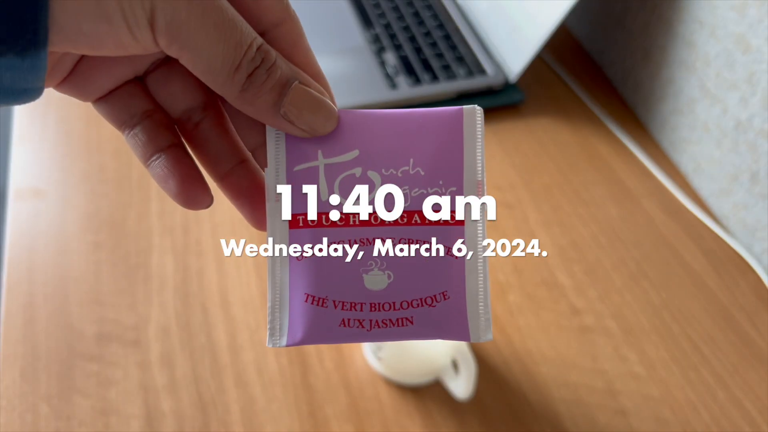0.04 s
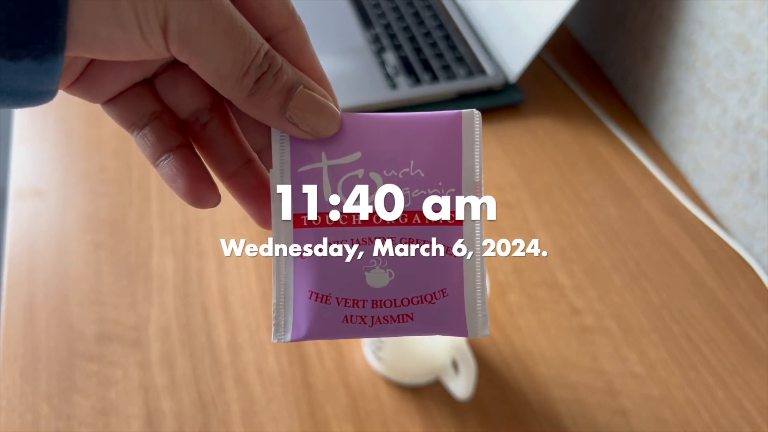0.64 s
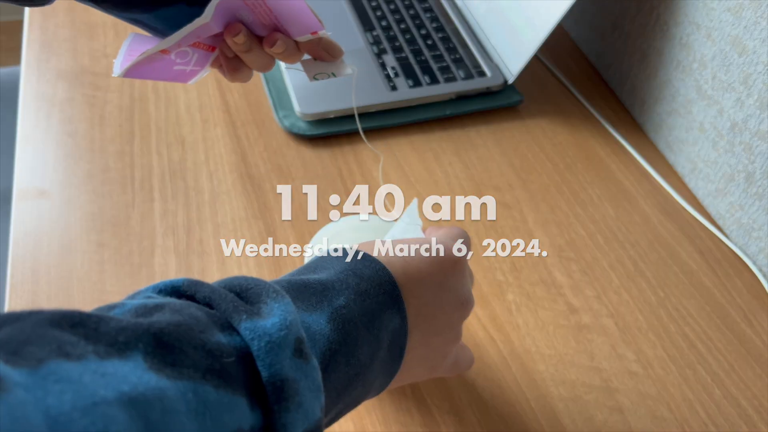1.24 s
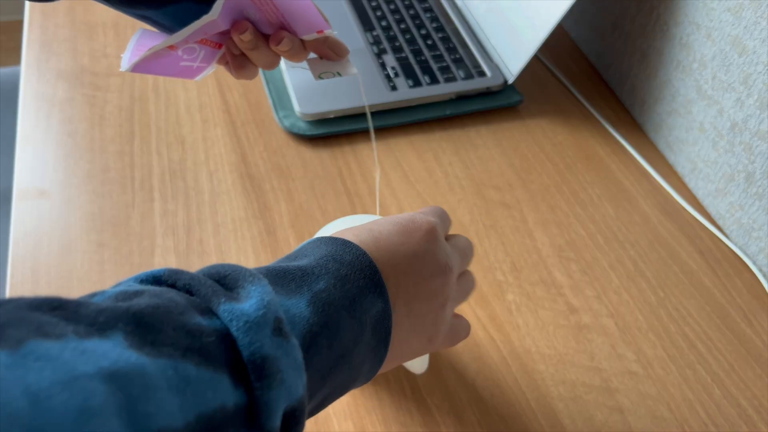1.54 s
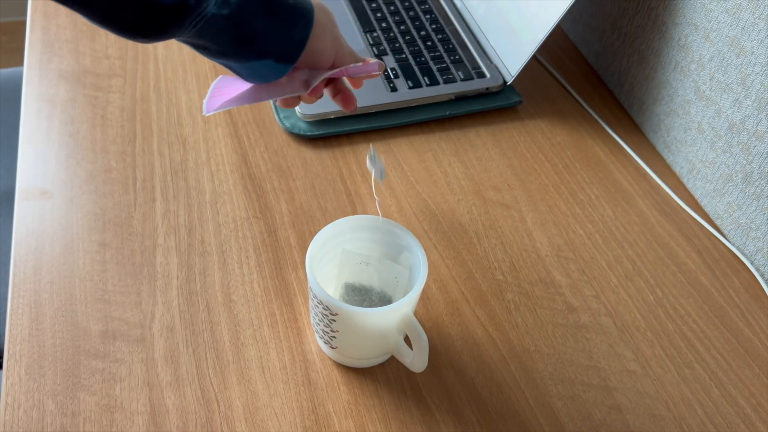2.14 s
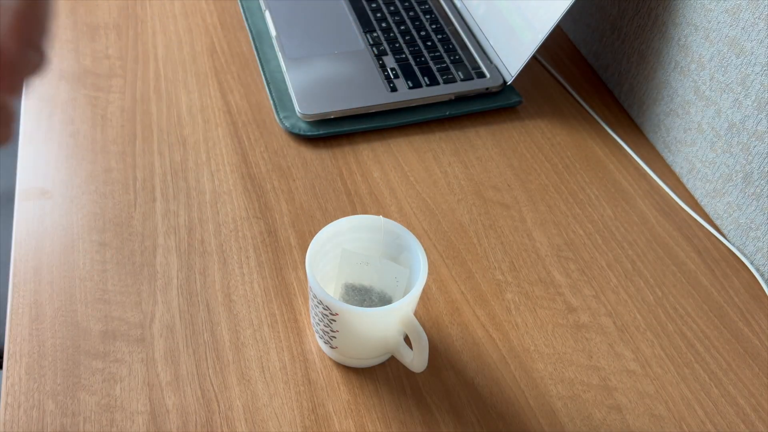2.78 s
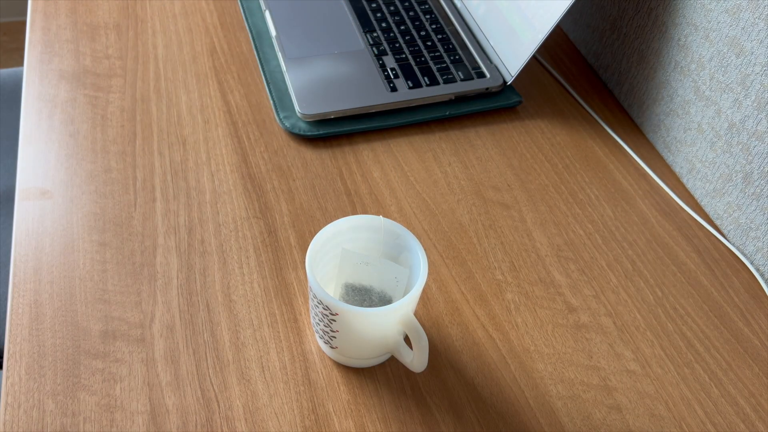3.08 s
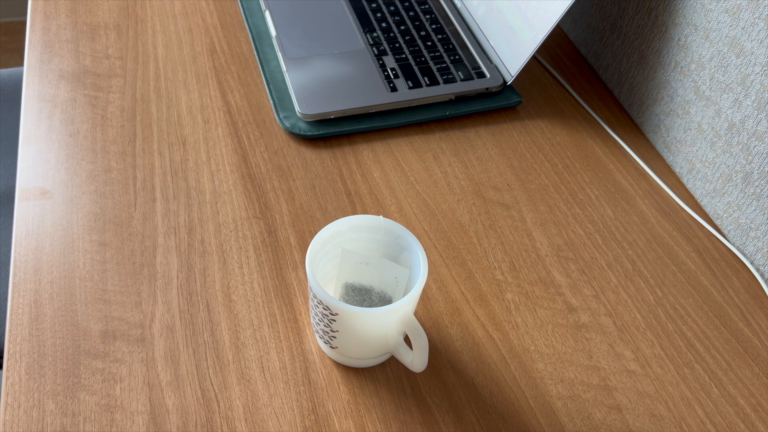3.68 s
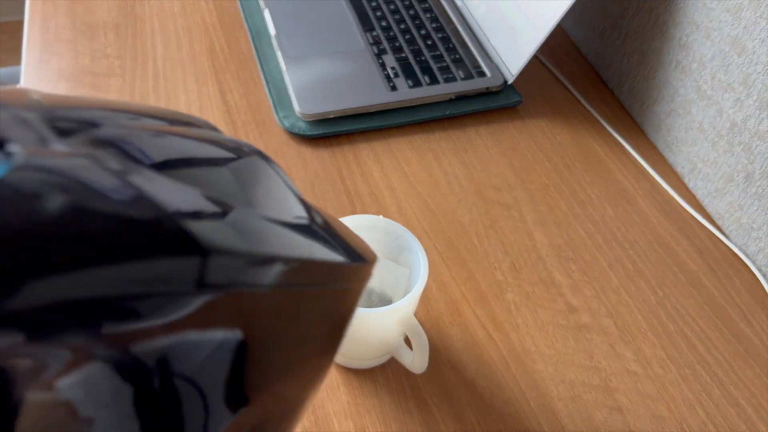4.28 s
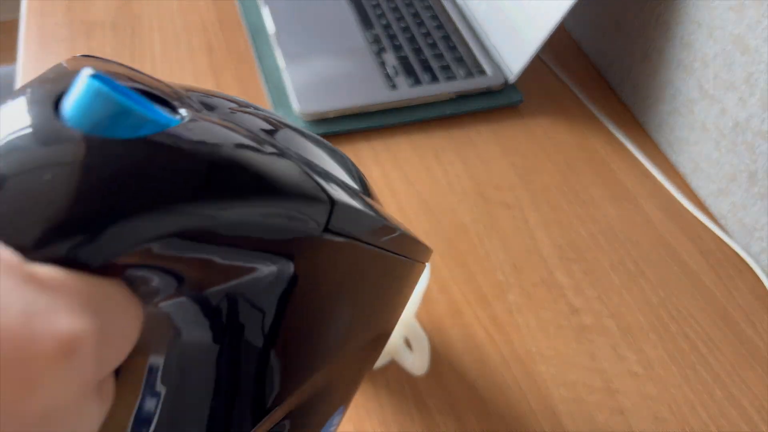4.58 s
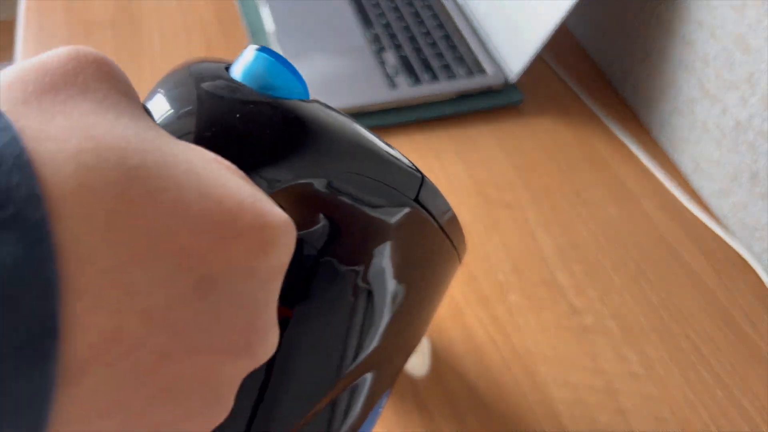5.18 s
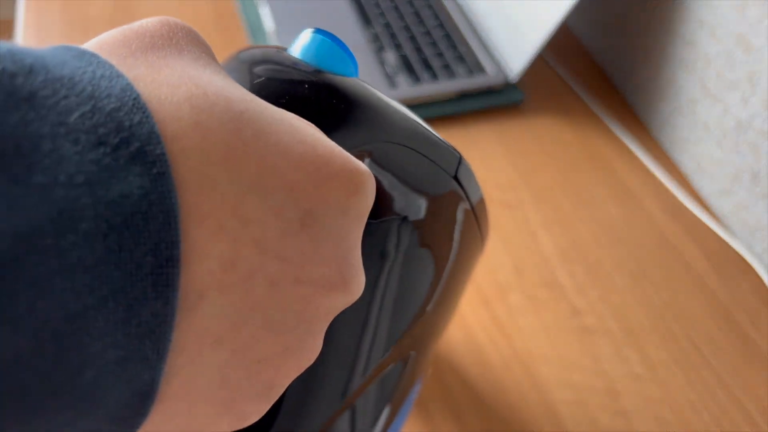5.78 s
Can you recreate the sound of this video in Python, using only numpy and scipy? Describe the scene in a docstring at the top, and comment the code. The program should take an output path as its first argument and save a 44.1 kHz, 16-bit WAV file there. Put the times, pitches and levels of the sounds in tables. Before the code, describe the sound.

A paper tea-bag wrapper rustles and tears open, with light knocks and clinks, then water starts trickling into a mug over a low hum.

```python
"""A low appliance hum, room rumble and a thin, narrow hiss lie under a desk, heard from close up.
From 1.2 s come light knocks and soft sliding strokes, and a paper tea-bag wrapper is handled: it rustles
as fibres catch and let go, its creases snap and it tears open. Two small clinks ring near 3.4 s.
Around 4 s something judders as a kettle comes near, and more strokes and knocks follow.
At 5.5 s water starts to trickle into a mug, a crowd of tiny ringing bubbles."""
import sys
import numpy as np
from scipy import signal
from scipy.fft import rfft, irfft, next_fast_len
from scipy.io import wavfile
from scipy.ndimage import map_coordinates

SR = 44100
rng = np.random.default_rng(int(sys.argv[2]) if len(sys.argv) > 2 else 0)


def write(x):
    x = np.atleast_2d(x).T
    wavfile.write(sys.argv[1], SR, np.round(np.clip(x, -1, 1) * 32767).astype(np.int16))


N = 256662

# the hum's envelope: (time [s], relative level [dB])
HUM_ENVELOPE = [(0.05, -45.5), (0.99, -44), (1.23, -49), (1.33, -44), (1.41, -46), (2.8, -44), (3.24, -45),
                (4.39, -44), (5.05, -48), (5.41, -44.5), (5.64, -48.5), (5.8, -46)]
# its harmonics: (harmonic number, relative level [dB])
HUM_HARMONICS = [(1, 4.5), (2, -17.5), (3, -21.5)]
# room rumble: (frequency [Hz], gain [dB])
RUMBLE_EQ = [(15, -14), (29, -0.5), (44, -3.5), (85, -4.5), (105, -6.5), (130, -6), (180, -11.5),
             (250, -22.5), (400, -31), (700, -63)]
# its stereo spread: (frequency [Hz], side over mid [dB])
RUMBLE_SPREAD = [(50, -11.5), (100, -17.5), (200, -4.5), (400, -3.5)]
# its balance: (frequency [Hz], left over right [dB])
RUMBLE_PAN = [(60, -6.5), (150, -4), (300, 1)]
# low puffs of air from the moving arm: (time [s], level [dB])
ARM_PUFFS = [(1.57, -49), (1.84, -54), (2.04, -51), (2.71, -51.5), (3.08, -52.5), (3.43, -50), (3.98, -52),
             (4.6, -55), (5.7, -54)]
# faint room air: (frequency [Hz], gain [dB])
AIR_EQ = [(150, -4.5), (350, 0), (500, -3.5), (700, -6), (1000, -10), (1150, -7), (1500, -10), (2200, -11),
          (3000, -19), (5300, -21), (6700, -17.5), (7600, -24.5), (8600, -22), (11000, -38), (16000, -32)]
# its balance: (frequency [Hz], left over right [dB])
AIR_PAN = [(60, -4), (110, -1.5), (200, -4), (380, 3), (700, 2), (1290, 10), (2380, 5), (4400, 10.5),
           (8120, 12.5), (15000, -7.5)]
# light knocks: (time [s], relative level [dB], contact time [s])
DESK_KNOCKS = [(1.225, -58.5, 0.0015), (1.2404, -57.5, 0.0013), (1.422, -62, 0.0014),
               (1.531, -57.5, 0.0005), (1.9756, -34, 0.0005), (2.0887, -51, 0.00023), (3.4315, -44, .002),
               (3.5465, -52, 0.00098), (3.561, -48, 0.0038), (3.602, -59, .0028), (4.2505, -54.5, 0.0024),
               (4.4575, -52, 0.0012), (4.925, -56.5, 0.0012)]
# the desk's ring: (frequency [Hz], relative level [dB], t60 [s])
DESK_MODES = [(922, -0.5, 0.059), (1109, -15.5, 0.12), (1377, 2.5, 0.035), (1816, -19, 0.078),
              (2340, 9, 0.0076), (2733, -4, 0.055), (3140, -35, 0.056), (4030, 0, .025), (5090, -24, 0.024)]
# a knock's contact noise: (frequency [Hz], gain [dB])
CONTACT_EQ = [(150, -12), (600, -2.5), (1100, 10), (3000, 1), (6000, 2.5), (14000, -26)]
# soft slides: (peak time [s], rise [s], fall [s], rub [dB], rustle [dB], fizz [dB])
SLIDE_STROKES = [(1.25, 0.093, 0.071, -71.5, -89, -87), (1.45, 0.057, 0.068, -73.5, -90, -86),
                 (1.55, 0.016, 0.036, -59, -66.5, -64), (4.012, 0.043, 0.059, -59.5, -57.5, -62.5),
                 (4.062, 0.035, 0.046, -54.5, -58.5, -67), (4.2, 0.045, 0.045, -69, -78.5, -91),
                 (4.254, 0.0055, 0.06, -61.5, -92, -84), (4.43, 0.15, 0.086, -71.5, -78, -79),
                 (4.57, 0.044, 0.06, -54.5, -58, -64), (4.615, 0.017, .04, -59, -61, -76),
                 (4.925, 0.045, 0.061, -64, -68, -79), (5.195, 0.014, 0.068, -79, -64.5, -77.5)]
# EQ on the slides, with a narrow gap near 10.7 kHz that is not their own: (frequency [Hz], gain [dB])
SLIDE_EQ = [(200, 0), (500, 0), (750, -5), (1200, -3), (2100, -9.5), (2700, -9), (3400, -6.5), (4400, -10),
            (5800, -11), (7500, -18.5), (9000, -16), (10000, -21.5), (10700, -42), (11600, -13.5),
            (13000, -12), (15000, -18), (16500, -38)]
# stereo spread of strokes and snaps: (frequency [Hz], side over mid [dB])
PAPER_SPREAD = [(200, -8), (700, 4), (2000, 1), (5000, 0), (9000, 5), (13000, -3.5)]
# their balance: (frequency [Hz], left over right [dB])
PAPER_PAN = [(60, 3), (110, 3), (200, -1), (380, 2.5), (700, -0.5), (1290, 4.5), (2380, 0), (4400, 9.5),
             (8120, 6.5), (15000, -2.5)]
# brief pitched noises: short rubs, and the low thump or bright ring of the loudest snaps:
# (time [s], pitch [Hz], glide [Hz/s], bandwidth [Hz], level [dB], half-length [s])
PITCHED_NOISES = [(1.246, 860, -2000, 111, -56, 0.0067), (1.555, 891, -6, 130, -64.5, 0.025),
                  (1.56, 2720, 0, 298, -70.5, .025), (1.86, 4440, 0, 450, -74, 0.047),
                  (2.7145, 3080, 0.5, 495, -34.5, .002), (2.703, 3200, 1, 900, -38.5, .008),
                  (3.03, 1745, -7, 350, -62.5, 0.031), (3.2251, 8250, 0, 600, -23, .0011),
                  (3.186, 448, 3, 161.2, -44, 0.0026), (3.227, 345, 1.5, 150, -49.5, 0.004),
                  (3.356, 1733, 5000, 480, -45.5, 0.013), (3.62, 817, -300, 151.6, -83, 0.068),
                  (4.05, 2204, -15000, 603, -66, 0.024), (4.53, 446, 0, 90, -53, 0.0074),
                  (4.2, 2950, 0, 600, -75.5, .025), (4.588, 2576, 5000, 500, -59, 0.022),
                  (4.945, 3410, 1200, 350, -70.5, 0.041)]
# creases giving way: (time [s], crackle level [dB], body over crackle [dB],
# sizzle over crackle [dB], t60 [s], low cut [Hz], left over right [dB])
CREASE_SNAPS = [(1.263, -75, -1, -9, 0.033, 600, -6), (2.182, -68, -18, -4, 0.035, 900, -5),
                (2.221, -74, -14, 3, 0.029, 900, -5), (2.245, -74.5, 0, -1, .03, 900, -7),
                (2.262, -70, -5.5, -6, .03, 900, -6), (2.328, -73.5, -4, 10.5, 0.041, 900, -4.5),
                (2.336, -81, 0, 5, 0.017, 900, -1), (2.36, -78.5, -1, 4, .022, 900, -6),
                (2.408, -77.5, -8, -2, 0.023, 900, -5), (2.6592, -62.5, -12, -9, 0.038, 400, -2.5),
                (2.671, -67.5, 0, -20, 0.023, 250, 0.5), (2.6756, -56.5, -6, 4.5, 0.028, 250, -2.5),
                (2.681, -51.5, -10, -6.5, 0.032, 250, 2), (2.6918, -44.5, -8, -15.5, .022, 400, 0.5),
                (2.6938, -47, -5, -18, 0.028, 500, 1), (2.698, -54, -4.5, -16, 0.036, 400, -4.5),
                (2.7138, -51.5, -6, -15.5, .022, 300, -3.5), (2.909, -65.5, -12, -14, .03, 700, 2),
                (3.0089, -55.5, -2, -38, 0.02, 1300, 0), (3.098, -58, -6.5, -10, 0.028, 1200, 2.5),
                (3.163, -60, -1, -16, .028, 1300, 0), (3.181, -44, -6, -4, 0.023, 1200, -0.5),
                (3.22, -54.5, -2, -11, .02, 400, -2), (3.2234, -48, -10.5, 12.5, 0.012, 400, 0.5),
                (3.2273, -53.5, -10, 7, 0.013, 400, 0), (3.233, -54, -14.5, 0.5, 0.012, 1500, 0.5),
                (3.2347, -57.5, -11, 4, 0.01, 1500, 1), (3.237, -48, -12.5, -7.5, .016, 1500, -1.5),
                (3.326, -65, 5, -11.5, 0.058, 700, -1), (3.333, -69, -5.5, 8.5, .025, 900, 1),
                (3.36, -52.5, -6, -2, 0.014, 1100, 0.5), (3.3718, -48, -4.5, -7.5, 0.019, 400, 0.5),
                (3.38, -62.5, 4, -10.5, 0.016, 400, -0.5), (3.414, -56, -1, 0, 0.035, 400, 0),
                (3.425, -65.5, 8, -14, .022, 400, -3), (3.4402, -54, 0.5, -4, 0.037, 350, -1),
                (3.522, -82, -8, 3.5, 0.017, 900, 6), (3.631, -83, 6, -6, 0.024, 600, 1),
                (3.734, -84.5, -8, 5.5, 0.048, 900, 1), (3.778, -72.5, 4.5, -1, .026, 600, 5),
                (3.787, -78.5, 4, -11, 0.023, 800, 7)]
# EQ on the snaps, with a narrow gap near 10.6 kHz that is not the paper's: (frequency [Hz], gain [dB])
SNAP_EQ = [(200, -10.5), (450, -8), (650, -16), (850, -4), (1150, -9.5), (1700, -1.5), (2450, -7.5),
           (3150, -2.5), (3700, -2.5), (4900, 3.5), (5600, -3.5), (6300, -4), (7200, -6), (8250, 2),
           (9300, 2), (10600, -11), (11800, 1.5), (13500, -5.5), (15500, -9), (17000, -15.5)]
# fingers on the wrapper: (peak time [s], rise [s], fall [s], rub [dB], rustle [dB], fizz [dB])
WRAPPER_STROKES = [(1.75, 0.09, 0.16, -76, -85.5, -84.5), (1.96, .1, 0.15, -65, -70, -75.5),
                   (2.05, .04, 0.15, -61, -70.5, -84), (2.29, .05, 0.09, -80, -67.5, -70),
                   (2.62, 0.15, 0.1, -67.5, -71, -77), (2.703, 0.012, 0.013, -44.5, -39, -62),
                   (2.74, .03, 0.07, -59.5, -59, -80), (2.818, .022, 0.04, -66.5, -57, -63.5),
                   (3.0, .04, 0.035, -62, -50, -56), (3.055, .028, .034, -60.5, -51.5, -54),
                   (3.15, .04, .05, -62.5, -51.5, -57), (3.258, .02, 0.04, -59.5, -48, -54.5),
                   (3.305, .02, .02, -61, -58.5, -61), (3.345, .015, 0.017, -53, -48, -50),
                   (3.41, .04, 0.098, -54.5, -55, -67), (3.62, .08, 0.13, -64, -68, -71),
                   (3.8, 0.02, 0.03, -62, -67.5, -77)]
# EQ on the rustle, with a narrow gap near 10.7 kHz that is not the paper's: (frequency [Hz], gain [dB])
RUSTLE_EQ = [(200, -5.5), (350, -4), (600, -9.5), (850, -10), (1100, -12), (1750, -10), (2400, -8.5),
             (3100, -6), (4400, -4.5), (5300, -2.5), (6200, -7), (7300, -16.5), (9000, -12.5),
             (10000, -19.5), (10700, -29), (11600, -10.5), (13000, -9), (15000, -15), (17000, -25.5)]
# taps on something hard: (time [s], relative level [dB])
CLINK_TAPS = [(3.3601, -37.5), (3.3722, -32.5)]
# its ring: (frequency [Hz], relative level [dB], t60 [s])
CLINK_RING = [(865, -8, 0.032), (1610, 1.5, 0.042), (4570, -9, .025), (4970, 4.5, 0.038),
              (5330, -7.5, 0.049), (5450, -5.5, 0.034)]
# strength of the slips in the judder: (time [s], relative level [dB])
JUDDER_ENVELOPE = [(3.94, -47.5), (3.957, -48), (3.994, -43.5), (4.015, -46), (4.05, -61)]
# the hollow body they ring: (frequency [Hz], relative level [dB], t60 [s])
HOLLOW_MODES = [(414, -3, 0.042), (486, 3.5, .042), (548, -3, 0.033), (755, -12, .016), (1150, -20, .012)]
# bubbling in the mug: (time [s], level [dB])
BUBBLE_ENVELOPE = [(5.499, -85), (5.532, -66), (5.56, -75), (5.59, -81), (5.615, -78), (5.66, -87),
                   (5.8, -80.5)]
# EQ on the splash: (frequency [Hz], gain [dB])
SPLASH_EQ = [(300, 2), (1000, 0), (3000, -7), (8000, -15), (10500, -24), (13000, -10), (16000, -20)]
# reflections off the desk top: (left delay [s], right delay [s], gain [dB])
DESK_ECHOES = [(.0007, .0011, -25), (.0019, 0.0021, -17), (.0033, .004, -12.5)]
# the room's reverb time: (frequency [Hz], t60 [s])
ROOM_DECAY = [(200, 0.23), (2000, 0.19), (6000, 0.27), (14000, 0.22)]

FIRM_CONTACT_S = 0.00041  # attack of a firm tap


def amp(db):
    """Decibels to gain."""
    return 10 ** (np.asarray(db) / 20)


def unit(x):
    """Scale to rms 1."""
    return x / np.sqrt(np.mean(x ** 2) + 1e-20)


def along(points, hz):
    """Read a curve of (frequency, value) points on a log axis."""
    freqs, values = np.transpose(points)
    return np.interp(np.log(hz + 1), np.log(freqs + 1), values)


def wobble(rate):
    """Smooth random modulation, rate knots a second."""
    return map_coordinates(rng.standard_normal(int(N * rate / SR) + 4), [np.arange(N) * rate / SR])


def swell(s, rise, fall, rise_shape=1.1):
    """An envelope that peaks at 1 at time s; a rise shape of 1 is pointed, 2 is rounded."""
    t = np.arange(N) / SR - s
    return np.exp(-np.abs(t / np.where(t < 0, rise, fall)) ** np.where(t < 0, rise_shape, 1.1))


def filtered(x, response):
    """Apply a frequency response."""
    n = x.shape[-1]
    padded = next_fast_len(n + 8192)
    return irfft(rfft(x, padded) * response(np.fft.rfftfreq(padded, 1 / SR)), padded)[..., :n]


def eq(x, curve):
    """Colour a sound with an EQ curve."""
    return filtered(x, lambda hz: amp(along(curve, hz)))


def add(track, s, sound):
    """Mix a sound into the track at time s."""
    part = track[:, round(s * SR):][:, :sound.shape[-1]]
    part += sound[..., :part.shape[-1]]


def pan(db):
    """Channel gains that put the left db above the right."""
    return amp(np.outer([.5, -.5], db))


def delay(hz, left_s, right_s):
    """The response of one delay per channel."""
    return np.exp(-2j * np.pi * np.outer([left_s, right_s], hz))


def placed(pair, spread, balance):
    """Two unrelated signals become left and right, with a spread and a balance for each frequency."""
    def mid_side(hz):
        side_gain = amp(along(spread, hz))
        return np.array([np.ones_like(hz), side_gain]) / np.hypot(1, side_gain)
    mid, side = filtered(pair, mid_side)
    return filtered(np.array([mid + side, mid - side]), lambda hz: pan(along(balance, hz)))


def bands(x, low_hz, high_hz):
    """Split into lows, mids and highs."""
    cuts = [(low_hz, "lowpass"), ([low_hz, high_hz], "bandpass"), (high_hz, "highpass")]
    return [signal.sosfilt(signal.butter(4, hz, kind, fs=SR, output="sos"), x) for hz, kind in cuts]


def hum(hz, trim_db, waver_db):
    """An appliance motor hums just under mains frequency; its level wavers."""
    t = np.arange(N) / SR
    phase = 2 * np.pi * hz * t + 0.15 * wobble(7.1)
    tone = sum(amp(db) * np.sin(k * phase + 2 * np.pi * rng.random()) for k, db in HUM_HARMONICS)
    level_db = np.interp(t, *np.transpose(HUM_ENVELOPE)) + trim_db + waver_db * wobble(11)
    return unit(tone) * amp(level_db) * pan(-1.2)


def room_tone(rumble_db, drift_db, air_db, hiss_db, hiss_hz, hiss_width_hz):
    """Rumble that swells with each puff from the arm, faint air, and a narrow hiss towards the left."""
    noise = lambda: rng.standard_normal((2, N))
    rumble = eq(placed(noise(), RUMBLE_SPREAD, RUMBLE_PAN), RUMBLE_EQ)
    puffs = sum(amp(db) * swell(s, rise=0.14, fall=0.038) for s, db in ARM_PUFFS)
    stir = np.hypot(amp(rumble_db + drift_db * wobble(3.6)), puffs)
    air = eq(placed(noise(), spread=[(1000, -0.38)], balance=AIR_PAN), AIR_EQ)
    hiss = filtered(noise(), lambda hz: 1 / (1 + (2 * (hz - hiss_hz) / hiss_width_hz) ** 2))
    return stir * unit(rumble) + amp(air_db) * unit(air) + amp(hiss_db) * unit(hiss) * amp([[0], [-16]])


def knocks(trim_db, contact_t60):
    """A dry contact noise and a short ring of the desk; a soft touch rises slowly and sounds dull."""
    out, t = np.zeros((2, N)), np.arange(SR // 5) / SR
    for s, db, contact_s in DESK_KNOCKS:
        softness = contact_s / FIRM_CONTACT_S
        cutoff_hz = 7933 / softness ** 0.99
        contact_db = 0.5 + 4 * np.log2(softness)  # softer means more noise against the ring
        scatter_db = rng.normal(0, 1.5, (len(DESK_MODES), 2, 1))
        # the two sides hear each mode a quarter of a cycle apart
        phases = 2 * np.pi * (rng.random((len(DESK_MODES), 1, 1)) + np.array([[0], [.25]]))
        ring = sum(amp(level + extra - 60 * t / t60) * np.sin(2 * np.pi * hz * t + phase)
                   for (hz, level, t60), extra, phase in zip(DESK_MODES, scatter_db, phases))
        noise = unit(eq(rng.standard_normal((2, len(t))), CONTACT_EQ))
        contact = noise * amp(contact_db - 60 * t / contact_t60)
        blow = (ring + contact) * (1 - np.exp(-t / contact_s))
        add(out, s, amp(db + trim_db) * filtered(blow, lambda hz: (1 + 1j * hz / cutoff_hz) ** -2))
    return out * pan(1.6)


def friction(strokes, curve, fizz_lead_s, catches_per_s, grain_share, flutter_db, rise_shape):
    """Paper slides: countless fibres catch and let go, a few singly; each stroke's fizz peaks first."""
    catches = (rng.random(N) < catches_per_s / SR) * rng.exponential(size=N)
    catch_decay = np.exp(-np.arange(SR // 100) / (SR * 0.00052))
    power = np.abs(signal.fftconvolve(catches ** 2, catch_decay)[:N])
    grain = np.sqrt(1 - grain_share + grain_share * power / power.mean())
    texture = rng.standard_normal((2, N)) * grain * amp(flutter_db * wobble(45))
    sheet = eq(placed(texture, PAPER_SPREAD, PAPER_PAN), curve)
    rub, rustle, fizz = bands(sheet, low_hz=2030, high_hz=8700)
    out = np.zeros((2, N))
    for k, (band, lead) in enumerate([(rub, 0), (rustle, 0), (fizz, fizz_lead_s)]):
        energy = sum((amp(levels[k]) * swell(s - lead, rise, fall, rise_shape)) ** 2
                     for s, rise, fall, *levels in strokes)
        out += unit(band * amp(flutter_db * wobble(110))) * np.sqrt(energy)
    return out


def pitched_noises():
    """Noise swells and fades in one gliding resonance: a short rub, or a loud snap's thump or ring."""
    out, clock = np.zeros((2, N)), np.arange(N) / SR
    for s, pitch, glide, width, db, half_length in PITCHED_NOISES:
        near = np.abs(clock - s) < half_length * 4
        t = clock[near] - s
        envelope = np.exp(-.5 * (t / half_length) ** 2)
        grit = filtered(rng.standard_normal((2, 2, SR)), lambda hz: 1 / (1 + (2 * hz / width) ** 2))
        grit = np.take(grit, np.arange(len(t)), axis=-1, mode="wrap")
        phase = 2 * np.pi * (pitch + glide * t / 2) * t
        band = grit[0] * np.cos(phase) + grit[1] * np.sin(phase)
        out[:, near] += amp(db) * unit(band * envelope) * np.sqrt(np.mean(envelope ** 2))
    return out * pan(2)


def snaps(grain, ripple_db, build_s, first_db, first_t60, right_lag_s):
    """A crease gives way with one crack and a run of tiny ones; large folds sound low, small ones high."""
    out, t = np.zeros((2, N)), np.arange(SR // 10) / SR
    knots_hz = np.geomspace(300, 17000, num=45)
    for s, db, body_db, sizzle_db, t60, low_cut_hz, pan_db in CREASE_SNAPS:
        cracks = rng.standard_normal((2, len(t))) * np.exp(grain * rng.standard_normal(len(t)))
        envelope = amp(-60 * t / t60) * (1 - np.exp(-t / build_s))
        run = placed(cracks * envelope, PAPER_SPREAD, PAPER_PAN)
        first = rng.standard_normal(len(t)) * amp(first_db - 60 * t / first_t60)
        first = filtered(first, lambda hz: pan(along(PAPER_PAN, hz)) * delay(hz, 0, right_lag_s))
        # every fold has its own shape, and so its own resonances
        fold = np.column_stack([knots_hz, ripple_db * rng.standard_normal(len(knots_hz))])
        colour = lambda hz: amp(along(SNAP_EQ, hz) + along(fold, hz))
        low_cut = lambda hz: hz ** 2 / np.hypot(hz ** 2, low_cut_hz ** 2)
        burst = filtered(first + run, lambda hz: colour(hz) * low_cut(hz)) * pan(pan_db)
        for band, band_db in zip(bands(burst, low_hz=2225, high_hz=6800), (body_db, 0, sizzle_db)):
            add(out, s, unit(band) * amp(db + band_db))
    return out


def clinks(pan_db):
    """Something hard is tapped and rings the same few modes each time; the top two beat."""
    out, t = np.zeros((2, N)), np.arange(SR // 5) / SR
    for s, db in CLINK_TAPS:
        ring = sum(amp(level - 60 * t / t60) * np.sin(2 * np.pi * (hz * t + rng.random((2, 1))))
                   for hz, level, t60 in CLINK_RING)
        add(out, s, amp(db) * ring * (1 - np.exp(-t / FIRM_CONTACT_S)))
    return out * pan(pan_db)


def judder(slips_per_s, scatter):
    """Something sticks and slips at an uneven rate; each slip sets the same hollow body ringing."""
    out, t = np.zeros((2, N)), np.arange(SR // 10) / SR
    times, levels = np.transpose(JUDDER_ENVELOPE)
    gaps = np.exp(scatter * rng.standard_normal(size=16)) / slips_per_s
    slips = times[0] + np.cumsum(gaps) - gaps[0]
    ring = sum(amp(db - 60 * t / t60) * np.sin(2 * np.pi * hz * t + rng.normal(0, 0.86, (2, 1)))
               for hz, db, t60 in HOLLOW_MODES)
    for s in slips[slips < times[-1]]:
        add(out, s, amp(np.interp(s, times, levels)) * ring * (1 - np.exp(-t / 0.0014)))
    return out


def trickle(bubble_hz, detune, bubbles_per_s, bubble_t60, rise_per_s, splash_db):
    """A thin stream makes a crowd of small, short bubbles, each rising in pitch, and a faint splash."""
    crowd, t = np.zeros((2, N)), np.arange(SR // 20) / SR
    times, levels = np.transpose(BUBBLE_ENVELOPE)
    clock = np.arange(N) / SR
    fade_in = np.clip((clock - times[0]) / 0.018 + 1, 0, 1)
    splash = eq(rng.standard_normal((2, N)), SPLASH_EQ)
    starts = np.arange(times[0] - .02, N / SR, 1 / bubbles_per_s)
    for s, (late, pitch, strength, right_phase) in zip(starts, rng.standard_normal((len(starts), 4))):
        phase = 2 * np.pi * bubble_hz * np.exp(detune * pitch) * (t + rise_per_s * t ** 2 / 2)
        envelope = amp(2 * strength - 60 * t / bubble_t60) * (1 - np.exp(-t / 0.00089))
        add(crowd, s + late / bubbles_per_s / 2, np.sin(phase + [[0], [right_phase]]) * envelope)
    bubbles = unit(crowd) * np.sqrt(fade_in.mean()) * amp(np.interp(clock, times, levels))
    return fade_in * (bubbles + amp(splash_db) * unit(splash))


def desk_bounce(x):
    """The desk top returns the sound almost at once and colours each side differently."""
    power = 1 + sum(amp(db) ** 2 for _, _, db in DESK_ECHOES)
    comb = lambda hz: 1 + sum(amp(db) * delay(hz, left, right) for left, right, db in DESK_ECHOES)
    return filtered(x, comb) / np.sqrt(power)


def reverb(x, blur_octaves, predelay_s):
    """A small room's diffuse tail has the broad colour of each sound but no ring of its own."""
    hz, t, spectrum = signal.stft(x, SR, nperseg=256)
    octave = np.log2(hz + 100)
    blur = np.exp(-.5 * ((octave[:, None] - octave) / blur_octaves) ** 2)
    power = (blur / blur.sum(1, keepdims=True)) @ np.abs(spectrum) ** 2
    age = t[t < .5]
    decay = amp(-60 * age / along(ROOM_DECAY, hz)[:, None]) ** 2 * (age > predelay_s)
    decay /= decay.sum(1, keepdims=True)
    tail = np.abs(signal.fftconvolve(power, decay[None], axes=2)[..., :len(t)])
    noise = signal.stft(rng.standard_normal((2, N)), nperseg=256)[2]
    return signal.istft(noise / noise.std() * np.sqrt(tail), nperseg=256)[1][:, :N]


def scene():
    """The mix: transients with reverb, strokes with desk bounce, dry water, a bed of hum and room tone."""
    creases = snaps(grain=0.5, ripple_db=4, build_s=0.00056,
                    first_db=-1.5, first_t60=0.003, right_lag_s=0.00015)
    rustle = friction(WRAPPER_STROKES, RUSTLE_EQ, fizz_lead_s=.002, catches_per_s=495,
                      grain_share=.28, flutter_db=0.5, rise_shape=1.4)
    slides = friction(SLIDE_STROKES, SLIDE_EQ, fizz_lead_s=0.0096, catches_per_s=650,
                      grain_share=.25, flutter_db=0.1, rise_shape=1.7)
    water = trickle(bubble_hz=835, detune=0.062, bubbles_per_s=220, bubble_t60=0.036,
                    rise_per_s=6, splash_db=-83.5)
    transients = creases + knocks(trim_db=-2, contact_t60=0.04) + clinks(pan_db=7.5)
    transients += pitched_noises() + judder(slips_per_s=82, scatter=0.081)
    bed = hum(hz=59.1, trim_db=-0.2, waver_db=0.1)
    bed += room_tone(rumble_db=-56.5, drift_db=1.6, air_db=-76.5,
                     hiss_db=-70, hiss_hz=1830, hiss_width_hz=260)
    tail = amp(-13.5) * reverb(transients, blur_octaves=.3, predelay_s=.005)
    return transients + tail + desk_bounce(rustle + slides) + water + bed


def record(dry):
    """A steep high cut at 16.1 kHz."""
    return filtered(dry, lambda hz: 1 / (1 + (hz / 16100) ** 120))


dry = scene()
out = record(dry)
write(out)
```